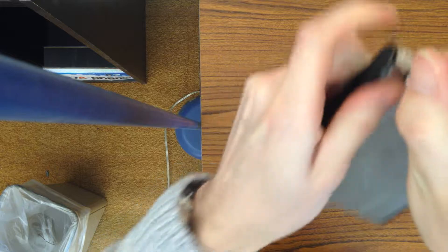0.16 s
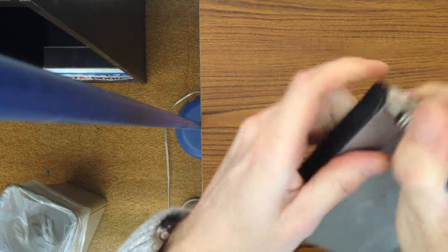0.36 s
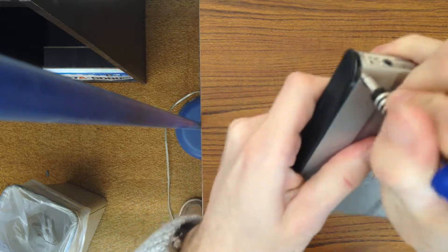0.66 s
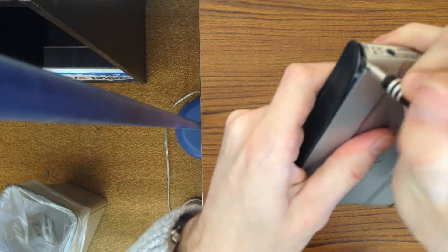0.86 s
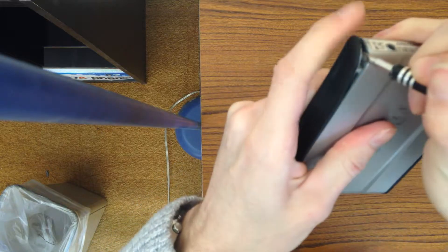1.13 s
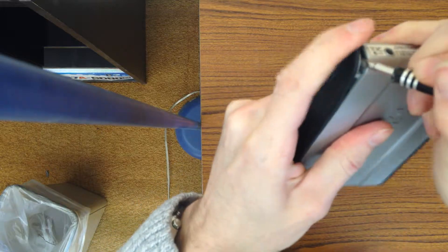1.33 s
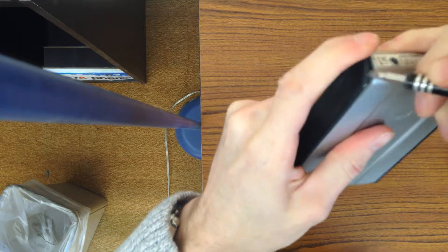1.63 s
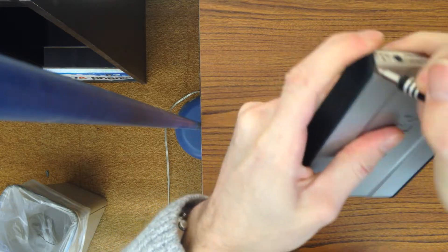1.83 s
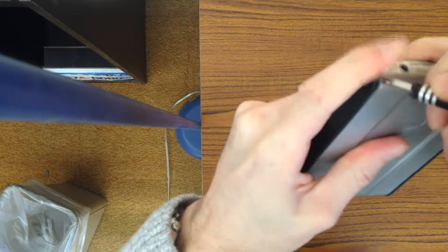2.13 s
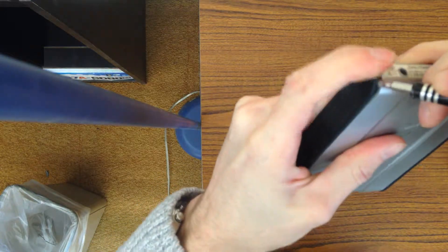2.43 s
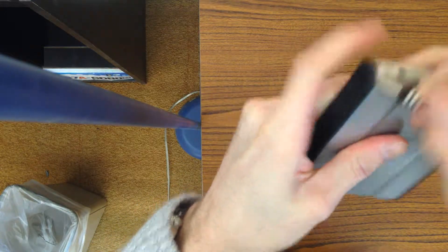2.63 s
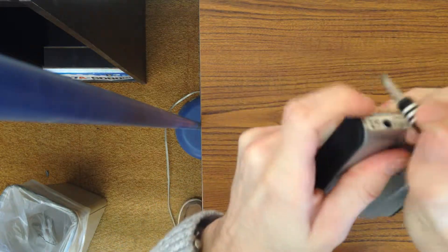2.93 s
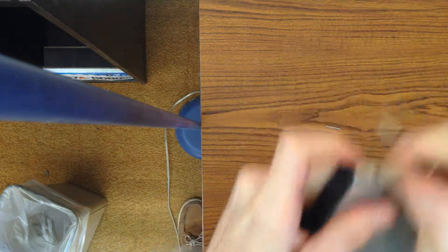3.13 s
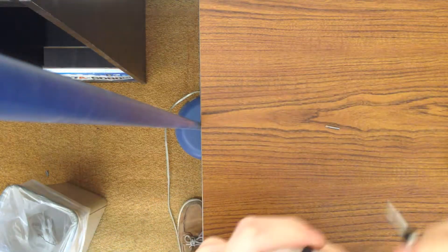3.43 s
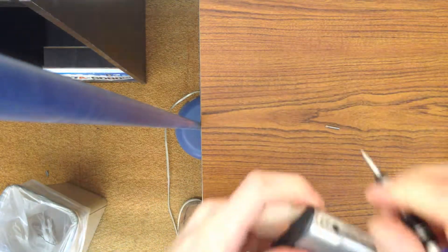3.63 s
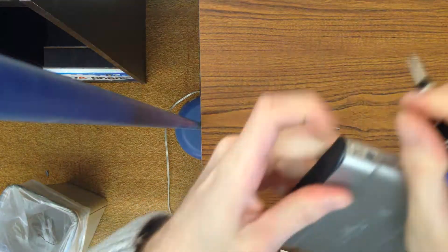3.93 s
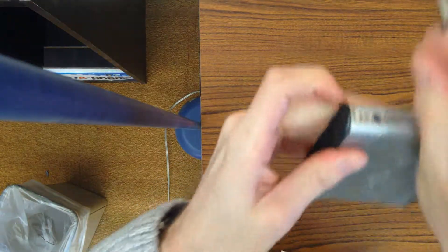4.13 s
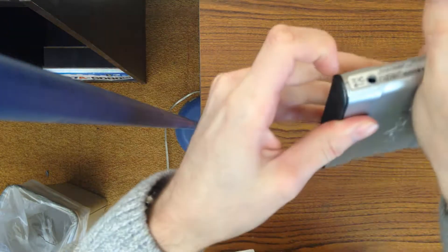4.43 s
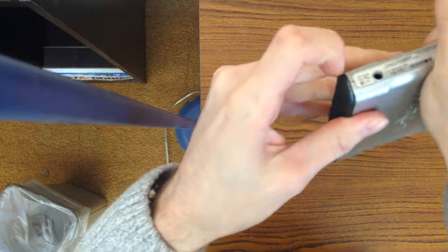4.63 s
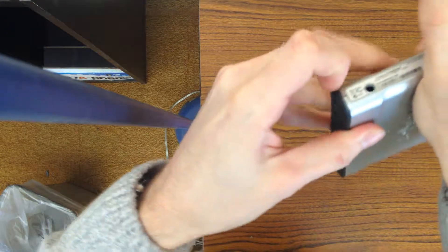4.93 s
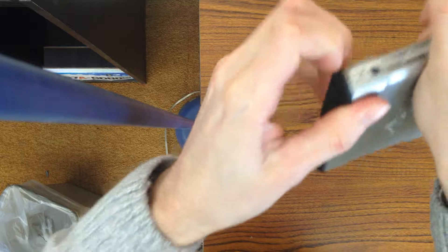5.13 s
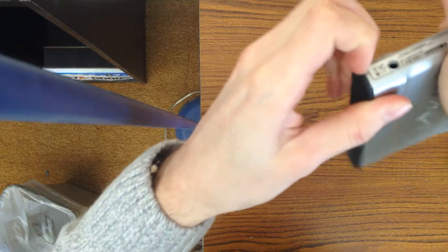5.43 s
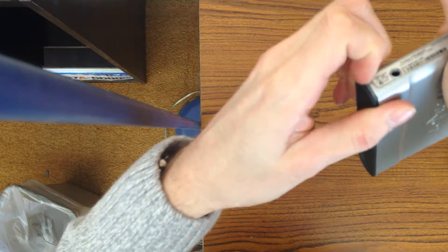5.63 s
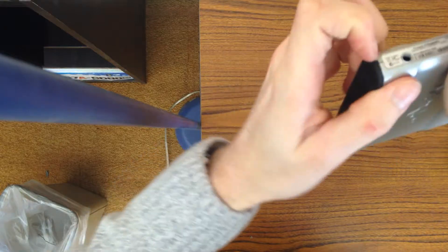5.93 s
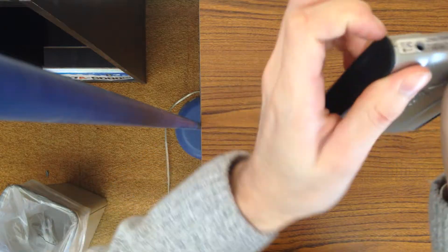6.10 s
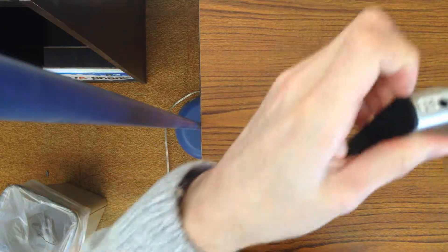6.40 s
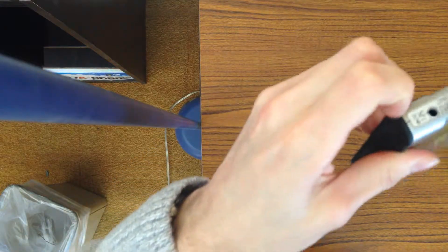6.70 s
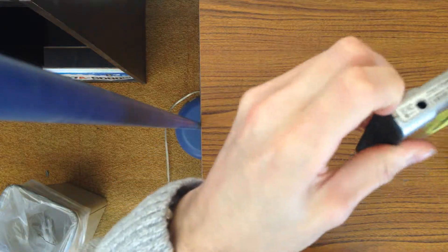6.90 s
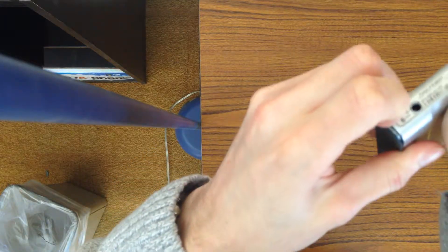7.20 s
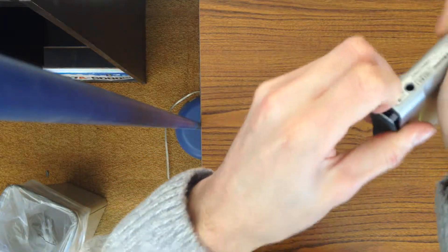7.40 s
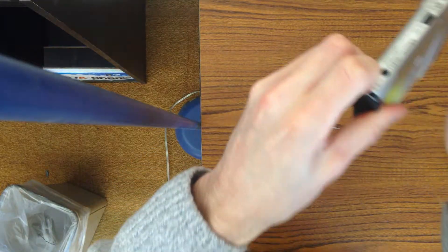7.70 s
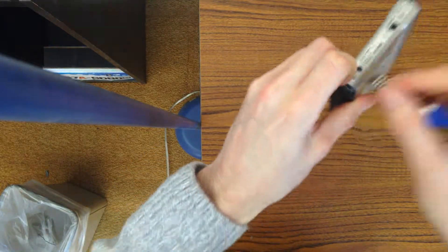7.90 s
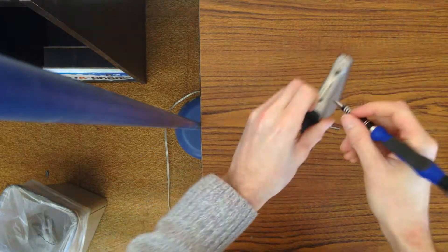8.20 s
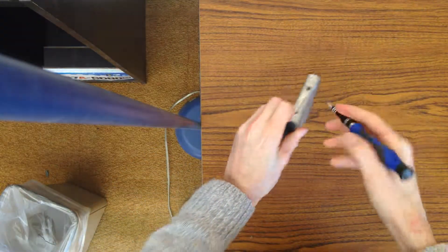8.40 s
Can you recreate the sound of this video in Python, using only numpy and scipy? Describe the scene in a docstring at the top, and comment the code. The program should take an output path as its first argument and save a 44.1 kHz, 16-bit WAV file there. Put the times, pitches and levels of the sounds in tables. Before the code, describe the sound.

A screwdriver pries at a snap-on plastic cap, with tiny ticks, scuffs and a few loud sharp snaps over a faint low hum.

```python
"""A machine hums low under steady hiss in a small, fairly dry room, all the way through.
From the first moments a screwdriver and fingers work at a snap-on plastic cap on a hand-held case,
close to a small microphone: contacts ring the case's modes, and skin and blade rub as patchy noise.
A few clacks come only as room echo; squeaks and mostly small plastic ticks are scattered among them.
The hardest snaps, near 1.8, 2.75, 4.75 and 7.3 s, ring, knock and crack at once."""
import sys
import numpy as np
from scipy import signal
from scipy.fft import rfft, irfft, next_fast_len
from scipy.io import wavfile
from scipy.ndimage import uniform_filter1d, map_coordinates

SR = 44100
rng = np.random.default_rng(int(sys.argv[2]) if len(sys.argv) > 2 else 0)


def volts_from_decibels(level):
    """Turn decibel levels (scalar or array-like) into linear amplitude factors."""
    exponent = np.asarray(level, float) / 20
    return 10 ** exponent


def digitize_waveform(pressure):
    """Quantize a signal to 16-bit integers and store it at the path in sys.argv[1].

    Rows of a 2-D input are taken as channels; values are limited to [-1, 1].
    """
    field = np.atleast_2d(pressure).T
    bounded = np.clip(field, -1, 1)
    quanta = np.round(bounded * 32767).astype(np.int16)
    wavfile.write(sys.argv[1], SR, quanta)


N = 377055  # samples in the scene


def unit(x):
    """Scaled to rms 1."""
    return x / np.sqrt(np.mean(x ** 2) + 1e-20)


def along(points, hz):
    """Reads a curve of (Hz, value) points on a log frequency axis."""
    f, v = np.transpose(points)
    return np.interp(np.log(hz + 1), np.log(f + 1), v)


def bump(hz, centre_hz, width):
    """A bell curve from 0 to 1 around a centre pitch; width is in log frequency."""
    return np.exp(-(np.log(hz / centre_hz + 1e-9) / width) ** 2)


def filtered(x, response):
    """x times a response of frequency."""
    m = next_fast_len(len(x) + 4096)
    return irfft(rfft(x, m) * response(np.fft.rfftfreq(m, 1 / SR)), m)[:len(x)]


def noise(spectrum, size=N):
    """Coloured noise of rms 1."""
    return unit(filtered(rng.standard_normal(size), lambda hz: volts_from_decibels(along(spectrum, hz))))


def wobble(rate, size):
    """A smooth random curve, rate knots a second."""
    return map_coordinates(rng.standard_normal(size // 16), [np.arange(size) * rate / SR])


def patchy(size, patchy_db):
    """White noise whose strength varies in patches of time and pitch."""
    z = signal.stft(rng.standard_normal(size), nperseg=256)[2]
    field = uniform_filter1d(rng.standard_normal(z.shape), size=7, axis=0)  # smooth over pitch
    field = uniform_filter1d(field, size=4, axis=1)  # smooth over time
    return signal.istft(z * volts_from_decibels(patchy_db * unit(field)), nperseg=256)[1][:size]


def add(track, s, sound):
    """Mixes a sound in at time s."""
    part = track[round(s * SR):][:len(sound)]
    part += sound[:len(part)]


# How fast the main part of the room's echo dies.
# Each row: frequency in Hz, time to fall by 60 dB in seconds.
ROOM_DECAY = [(300, 0.11), (800, 0.21), (2100, 0.21), (5500, 0.19), (14600, 0.13)]


def echo(x, gap):
    """A fresh room tail of energy 1: each frequency dies at its own speed; gap (s) is the build-up time."""
    hz, t, z = signal.stft(rng.standard_normal(SR // 2), SR, nperseg=256)
    z /= np.abs(z) ** 0.15  # dense reflections fade evenly
    fall_db = -60 * t / along(ROOM_DECAY, hz)[:, None]
    far_end = volts_from_decibels(-21.0 + fall_db / 2)  # lingers
    desk = volts_from_decibels(3.5 + 4.4 * fall_db)  # answers at once
    z *= volts_from_decibels(fall_db) + far_end + desk
    tail = signal.istft(z, SR, nperseg=256)[1]
    tail *= 1 - np.exp(-np.arange(len(tail)) / SR / gap)  # reflections build up
    return signal.fftconvolve(x, tail / np.linalg.norm(tail))


# The machine's humming bands.
# Each row: centre in Hz, width in Hz between the half-amplitude points, rms level in dB.
HUM_BANDS = [(43, 10, -77), (63.4, 3.6, -61), (67.7, 2, -60), (122, 8.6, -67), (154, 48, -68.5),
             (192.2, 11, -65.5), (329, 3.6, -72)]


def hum():
    """Narrow bands of noise, which waver by themselves."""
    out = np.zeros(N)
    for hz, width, db in HUM_BANDS:
        band = filtered(rng.standard_normal(N), lambda f: 1 / (1 + (2 * (f - hz) / width) ** 2))
        out += volts_from_decibels(db) * unit(band)
    return out


# The colour of the room and microphone hiss.
# Each row: frequency in Hz, relative level in dB per Hz.
AIR_COLOUR = [(21, -30.5), (36, -2.5), (177, -6.5), (240, -12.5), (317, -13), (612, -21), (894, -26),
              (15200, -38.5)]


def air():
    """Steady coloured noise whose level drifts slightly around -61 dB."""
    return volts_from_decibels(-61 + 1.3 * wobble(12, size=N)) * noise(AIR_COLOUR)


# The ringing modes of the plastic case.
# Each row: frequency in Hz, relative level in dB, time to fall by 60 dB in seconds when struck.
CASE_MODES = [(436, -6, 0.015), (565, -4.5, 0.018), (893, -0.5, 0.021), (1104, -4, 0.026), (1300, 0, 0.013),
              (1560, -3, 0.019), (2050, -1, .018), (2320, 4, 0.0067), (2800, -0.5, 0.0063),
              (3330, 1, 0.0093), (3730, 2.5, 0.0098), (4210, 0.5, 0.0027), (5600, -2.5, 0.0074),
              (6880, -4, .008), (8000, -3, 0.0068)]


def rubbed(size):
    """Patchy noise through the broadened modes of the case, rms 1."""
    def wall(f):
        modes = sum(volts_from_decibels(db) / (1 + ((f - hz) * t60 / 2.0) ** 2) for hz, db, t60 in CASE_MODES)
        return modes / (1 + f / 1500)
    return unit(filtered(patchy(size, patchy_db=2.5), wall))


# Fingers on the wall mute some modes of any contact within a twentieth of a second.
# Each row: time in seconds, muted pitch in Hz, depth in dB, width in log frequency.
FINGER_GRIPS = [(1.764, 800, 8, .25), (1.765, 7000, 6, 0.19), (4.745, 2220, 15, .12),
                (4.746, 1100, 6, 0.35), (4.747, 3460, 7, .1), (4.748, 4980, 8.5, .15),
                (7.340, 2644, 8, 0.085), (7.341, 800, 6.5, 0.285), (7.342, 3790, 8.5, 0.073)]


def struck_modes(s, db, best_hz, t):
    """Decaying sines of the wall: modes near the struck spot's pitch speak up, muted ones sink."""
    hz, mode_db, t60 = np.transpose(CASE_MODES)[:, :, None]
    # -45.5 dB reaches 0.33 in log frequency, fainter contacts further, louder ones soon only 0.1
    spread = max(0.33 - 0.88 * (db + 45.5), 0.1)
    spot_db = -14 * (1 - bump(hz, best_hz, spread))
    for grip_s, muted_hz, depth_db, width in FINGER_GRIPS:
        if abs(s - grip_s) < 1 / 20:
            spot_db -= depth_db * bump(hz, muted_hz, width)
    chance = rng.standard_normal((3, len(hz), 1))
    held_hz = hz * (1 + 0.02 * chance[0])  # the grip detunes the modes
    level_db = mode_db + spot_db + 1.8 * chance[1] - 60 * t / t60
    turn = np.arange(len(hz))[:, None] / 2  # neighbouring modes start in opposite phase
    waves = np.sin(2 * np.pi * (held_hz * t + turn + 0.11 * chance[2]))
    return volts_from_decibels(level_db) * waves * (1 - np.exp(-t / 0.00026)) ** 2


# The colour of the dry crack.
# Each row: frequency in Hz, relative level in dB per Hz.
CRACK_COLOUR = [(2500, -32.5), (4500, 1), (8000, -0.5), (13000, -7.5), (16000, -6.5)]


def contact(out, s, db, best_hz, crack_db, knock_db):
    """A strain creak, then the wall rings, its hollow body knocks, it cracks drily; the room answers."""
    t = np.arange(SR // 16) / SR
    bins_hz = np.fft.rfftfreq(len(t), 1 / SR)
    modes = struck_modes(s, db, best_hz, t)
    hollow = np.transpose(CASE_MODES)[0] < 1200  # the low modes make the knock
    ring = unit(modes[~hollow].sum(0)) + volts_from_decibels(knock_db) * unit(modes[hollow].sum(0))
    crack = noise(CRACK_COLOUR, size=len(t)) * np.exp(-t / 0.0017) * (1 - np.exp(-t / 0.0003))
    hit = ring + volts_from_decibels(crack_db) * unit(crack)
    gain = volts_from_decibels(db) / np.abs(hit).max()
    add(out, s, gain * hit)

    lead = SR // 100
    creak = rubbed(lead) * np.linspace(0, 1, lead) ** 6  # the plastic strains before it lets go
    add(out, s - lead / SR, volts_from_decibels(db - 31.0) * creak)

    # the room hears the case from all sides, so its colour is the smoothed spectrum of the blow
    crack_colour = np.sqrt(len(t)) * unit(volts_from_decibels(along(CRACK_COLOUR, bins_hz)))
    power = uniform_filter1d(np.abs(rfft(ring)) ** 2, size=48) + (volts_from_decibels(crack_db) * crack_colour) ** 2
    power = power.mean() * unit(power ** 0.41) ** 2  # other sides even out peaks and dips
    tail = filtered(echo([1], gap=0.002),
                    lambda f: gain * np.sqrt(np.interp(f, bins_hz, power) / (1 + f / 9000)))
    add(out, s, volts_from_decibels(-9.0 + 1.4 * wobble(110, size=len(tail))) * tail)  # single walls stand out


# Contacts on the case.
# Each row: start in seconds, peak in dB before the room answers, best-excited pitch in Hz,
# crack level in dB and knock level in dB, both against the ring.
CONTACTS = [(0.109, -41.5, 1720, -1, -4), (0.1768, -34, 2750, -8.5, -30), (0.1893, -40, 1790, -20, -8),
            (0.446, -43, 1560, -5, -5.5), (0.9156, -26, 3560, -0.5, 5.5), (1.042, -30.5, 3720, -1, -27),
            (1.177, -42.5, 1740, -17, -6), (1.211, -41.5, 1560, -23, -7), (1.3123, -45, 1730, -11, -18),
            (1.4515, -43, 1630, -8, -8), (1.6497, -44.5, 1390, -6, 5), (1.696, -45, 1450, -6, 9),
            (1.7425, -39, 2520, -6.5, -10), (1.765, -2, 2800, -5, -19), (1.869, -39, 1900, -31, -14),
            (1.889, -40.5, 2424, -6, -9), (2.1134, -34.5, 2040, -23, -22), (2.1173, -34, 1820, 3.5, -2.5),
            (2.3141, -42, 1343, -17, -7.5), (2.3665, -46.5, 1470, -11, -11), (2.392, -30, 1880, -4, -8),
            (2.4384, -38, 1340, -16, -16), (2.4788, -45.5, 1720, 7, -18), (2.669, -42.5, 1660, -10, -5),
            (2.703, -33.5, 1830, -11, -1), (2.7486, -15.5, 2760, -5.5, -18), (2.7534, -21, 2500, -16, -19),
            (2.7611, -24.5, 2050, 6, 0.5), (2.843, -32.5, 4020, 18, -15), (2.864, -32.5, 2240, 9, -30),
            (3.0367, -42, 3670, -6, -30), (3.3257, -31.5, 3200, -5, -12), (3.5955, -43, 1870, -27.5, 2.5),
            (3.8653, -19.5, 3370, 3, -10), (4.0525, -43, 1650, -27, -2), (4.7464, -7.5, 1560, 4.5, -10.5),
            (4.7472, -11.5, 2850, 0.5, -19), (4.919, -45.5, 2050, -3, -14), (4.954, -42, 2730, 3.5, -5),
            (4.988, -48, 1750, -4, -11), (5.084, -45, 1560, -14, 5), (6.0084, -48.5, 2090, -15, -15.5),
            (6.443, -45, 2070, -6, -30), (6.9917, -47, 2356, -17.5, 0), (7.1603, -43, 2200, -15, -28),
            (7.184, -38, 2250, -10.5, -19), (7.1955, -40, 2050, -12, -19), (7.209, -40, 2050, -11.5, -13),
            (7.224, -46, 2130, -5, -19), (7.3396, -7.5, 2800, -3.5, -16), (7.3468, -17, 2170, -7, -17.5),
            (7.6268, -25, 1613, 4.5, -8), (8.0165, -22.5, 5600, 4.5, -22)]


def clicks():
    """Blows and snaps on the case, each with its own share of crack and knock."""
    out = np.zeros(N)
    for row in CONTACTS:
        contact(out, *row)
    return out


def stroke_shape(length, t):
    """Fades a rub in and, more slowly, out; longer strokes have longer edges."""
    edge = 0.005 + 0.054 * length  # seconds
    fade_in = np.clip(t / edge, 0, 1)
    return fade_in * np.clip((length + 1.64 * edge - t) / (3.14 * edge), 0, 1)


def rub_band(size, centre_hz, width):
    """Patchy noise in one band of pitch; width is in log frequency."""
    return filtered(patchy(size, patchy_db=2.0), lambda hz: bump(hz, centre_hz, width))


# Skin and blade sliding on the case.
# Each row: start in seconds, rough length in seconds, dull rub in dB, hiss in dB
# (both rms over a third of a second before the stroke's fades).
SLIDES = [(0.115, 0.1, -62.5, -68), (0.184, 0.054, -66, -61), (0.234, 0.078, -66, -73),
          (0.335, 0.18, -63.5, -67.5), (0.498, 0.098, -65, -56.5), (0.547, 0.18, -69, -66.5),
          (0.78, 0.033, -62, -64), (1.057, 0.034, -69.5, -62), (1.11, 0.051, -72, -75),
          (1.162, 0.045, -66, -65), (2.299, 0.07, -72.5, -87), (2.66, 0.17, -64, -67),
          (2.742, 0.045, -59, -44.5), (2.848, 0.039, -59, -55.5), (2.886, 0.12, -72, -68),
          (3.026, 0.08, -64.5, -65.5), (3.182, 0.32, -65.5, -69), (3.326, 0.094, -53.5, -55.5),
          (3.458, 0.031, -72, -69), (3.52, 0.096, -65, -65.5), (3.854, 0.018, -40, -44),
          (4.105, 0.031, -72, -67), (4.186, 0.087, -75, -72), (4.396, 0.14, -74.5, -73.5),
          (5.08, 0.058, -70, -67), (5.196, 0.1, -67.5, -65.5), (6.104, 0.038, -67, -67.5),
          (6.164, 0.065, -68, -55), (6.282, 0.088, -67, -66.5), (6.379, 0.07, -69.5, -69.5),
          (6.473, 0.082, -68, -72), (6.702, 0.067, -68.5, -67), (6.791, 0.034, -67.5, -66),
          (7.001, 0.088, -73, -75.5), (7.09, 0.046, -68, -66.5), (8.158, 0.093, -68, -76),
          (8.368, 0.19, -71, -72.5)]


def strokes():
    """Each stroke hisses in uneven stick-slip clumps, with a dull rub from the case wall."""
    out, t = np.zeros(N), np.arange(SR // 3) / SR
    for s, length, dull_db, hiss_db in SLIDES:
        grip = wobble(101, size=len(t))
        dull = unit(volts_from_decibels(2.5 * grip) * rubbed(len(t)))
        hiss = unit(volts_from_decibels(2.1 * grip) * rub_band(len(t), centre_hz=7100, width=0.74))
        add(out, s, stroke_shape(length, t) * (volts_from_decibels(dull_db) * dull + volts_from_decibels(hiss_db) * hiss))
    return out


# Clacks shielded from the microphone.
# Each row: start in seconds, level in dB (the early rms lies 10.5 dB below it), ring pitch in Hz,
# ring level in dB, body level in dB, ring width in Hz from centre to half amplitude.
SHIELDED_CLACKS = [(0.451, -24.5, 5800, -10.5, -7.5, 690), (3.986, -28, 6400, 0, -5, 300),
                   (5.42, -23.5, 7040, -10.5, -4.5, 601), (7.67, -22, 5910, -5.5, -9, 120),
                   (8.130, -37.5, 6400, 15.5, 13.5, 900)]
# The colour of a clack's hiss. Each row: frequency in Hz, relative level in dB per Hz.
CLACK_COLOUR = [(1760, -39), (4000, -19), (5200, -10.5), (12000, -5.5), (15200, -8.5)]
# The colour of a clack's body. Each row: frequency in Hz, relative level in dB per Hz.
BODY_COLOUR = [(290, -30), (500, -22.5), (2000, -8), (4000, -12), (5200, -24.5), (8800, -120)]


def clacks():
    """Only the room carries these blows: a hissy swell with one short steel ring."""
    out = np.zeros(N)
    for s, db, ring_hz, ring_db, body_db, width_hz in SHIELDED_CLACKS:
        # each blow favours its own pitches
        clumps = list(zip(np.geomspace(800, 16000, 30), 3.2 * rng.standard_normal(30)))

        def colour(hz):
            hiss = volts_from_decibels(along(CLACK_COLOUR, hz))
            body = volts_from_decibels(body_db + along(BODY_COLOUR, hz))
            ring = volts_from_decibels(ring_db) / (1 + ((hz - ring_hz) / width_hz) ** 2)
            return (hiss + body + ring) * volts_from_decibels(along(clumps, hz))

        heard = filtered(echo([1], gap=0.00075), colour)
        t = np.arange(len(heard)) / SR
        heard *= volts_from_decibels(1.1 * wobble(303, size=len(t)))  # single walls stand out
        heard *= 1 - 1.04 * np.exp(-t / 0.013)  # the reflections pile up at first
        early_rms = np.sqrt(np.mean(heard[:SR // 30] ** 2))
        add(out, s, volts_from_decibels(db - 10.5) * heard / early_rms)
    return out


# Rubs that sound in one band, from thin squeak to low scuff.
# Each row: start in seconds, rough length in seconds, level in dB (rms over a third of a second
# before the fades), pitch in Hz, width in log frequency.
BAND_RUBS = [(1.032, 0.012, -42, 3680, 0.12), (1.03, 0.018, -54, 5950, 0.66),
             (1.035, 0.011, -50.5, 2500, 0.2), (1.114, 0.047, -69, 1890, .04),
             (1.38, 0.26, -71, 1300, 0.22), (3.331, 0.075, -54.5, 795, 0.32), (3.47, 0.02, -62, 750, 0.15),
             (3.474, 0.014, -60, 4600, .06), (6.02, 0.071, -74, 1420, 0.046), (6.101, 0.06, -74, 1380, .05),
             (6.204, 0.076, -61, 527, 0.22), (6.342, 0.1, -65, 474, 0.34), (6.922, 0.052, -75.5, 1400, .05),
             (7.094, 0.045, -63.5, 2100, .06), (8.133, 0.03, -55, 2240, .05)]


def squeaks():
    """Each rub is one band of patchy noise with an unsteady level."""
    out, t = np.zeros(N), np.arange(SR // 3) / SR
    for s, length, db, hz, width in BAND_RUBS:
        rub = unit(volts_from_decibels(1.1 * wobble(112, size=len(t))) * rub_band(len(t), hz, width))
        add(out, s, stroke_shape(length, t) * volts_from_decibels(db) * rub)
    return out


# Clear ticks of the strained plastic.
# Each row: start in seconds, peak in dB before the room answers, best-excited pitch in Hz.
STRAIN_TICKS = [(1.293, -50, 1220), (1.33, -52, 1100), (1.385, -53, 3700), (1.391, -50, 1070),
                (1.425, -53, 1250), (1.469, -50, 1190), (1.499, -48, 1400), (1.546, -54.5, 1190),
                (1.573, -51, 1300), (1.594, -52, 1400), (1.625, -52.5, 1285), (2.177, -52, 1180),
                (2.206, -48.5, 2024), (2.328, -49, 1300), (2.337, -50, 1500), (2.349, -47, 1300),
                (2.401, -42.5, 1500), (2.488, -47, 1500), (2.767, -29, 2800), (3.52, -50, 1002),
                (3.543, -63, 1200), (3.819, -44.5, 2890), (3.838, -46, 1500), (4.225, -51.5, 1300),
                (6.239, -49.5, 1496), (6.318, -47.5, 3700), (6.408, -50.5, 1470)]


def ticks():
    """Mostly small contacts that chiefly ring, with the same modest crack and knock each time."""
    out = np.zeros(N)
    for s, db, best_hz in STRAIN_TICKS:
        contact(out, s, db, best_hz, crack_db=-14.5, knock_db=-5.5)
    return out


def scene():
    """Machine, case, hands and room together; the room answers the rubs too."""
    rubs = strokes() + squeaks()
    rubs_echo = volts_from_decibels(-12.0) * echo(rubs, gap=0.00071)[:N]
    return (hum() + air() + clicks() + rubs + rubs_echo + clacks() + ticks())[None]


def band_limit(x):
    """A steep low-pass at the top of the band."""
    return signal.sosfilt(signal.butter(12, 16500, fs=SR, output="sos"), x)


def record(dry):
    """The recorder drops the deepest bass and falls steeply at its band edge."""
    def response(hz):
        treble = volts_from_decibels(-32 * np.clip((hz - 15300) / 150, 0, 1))  # 32 dB down within 150 Hz
        return treble / (1 + (28 / (hz + 1)) ** 4)
    mix = filtered(dry[0], response)[None]
    return band_limit(mix)


dry = scene()
out = record(dry)
digitize_waveform(out)
```